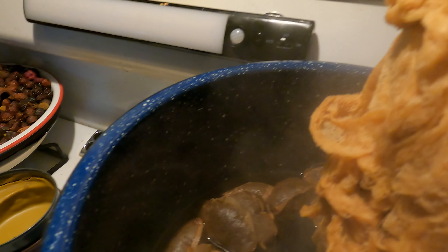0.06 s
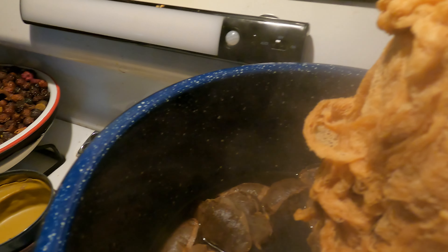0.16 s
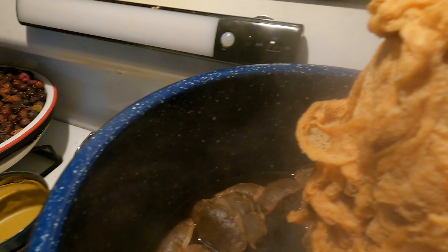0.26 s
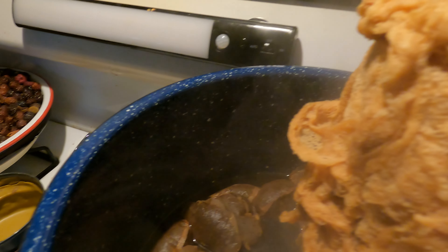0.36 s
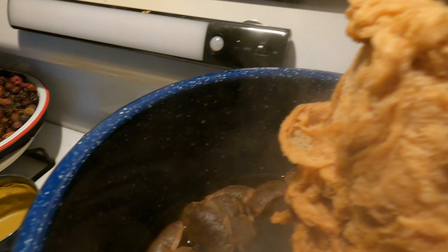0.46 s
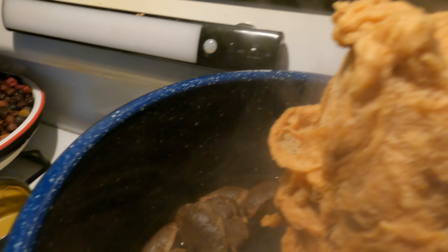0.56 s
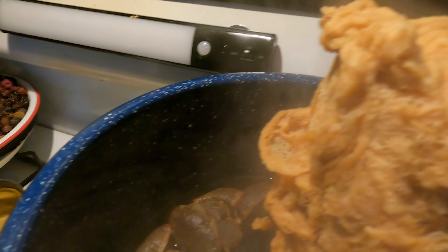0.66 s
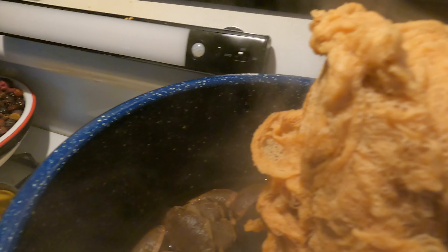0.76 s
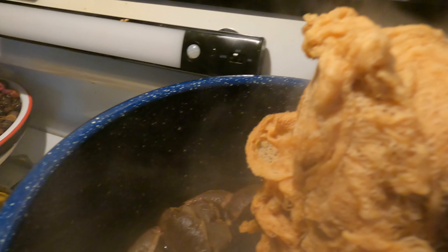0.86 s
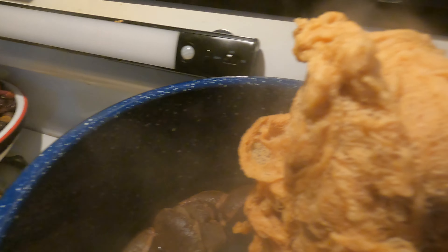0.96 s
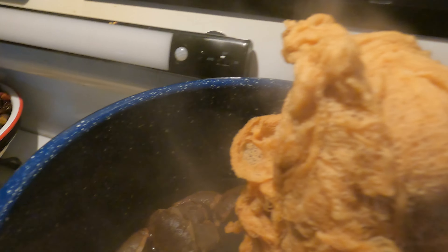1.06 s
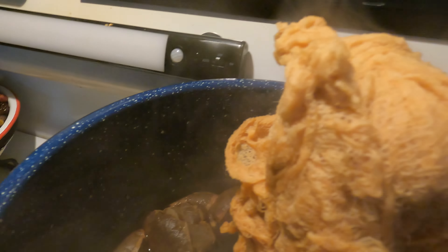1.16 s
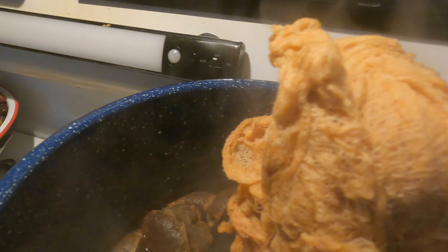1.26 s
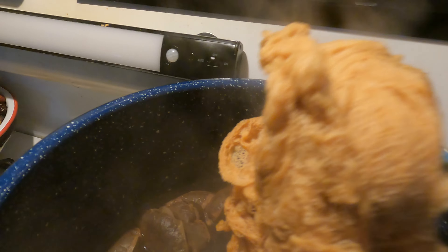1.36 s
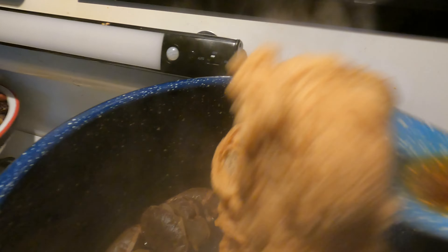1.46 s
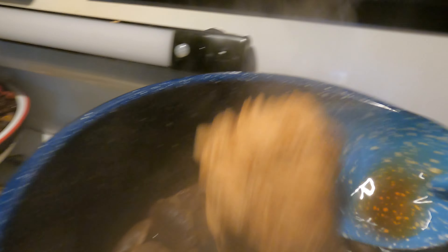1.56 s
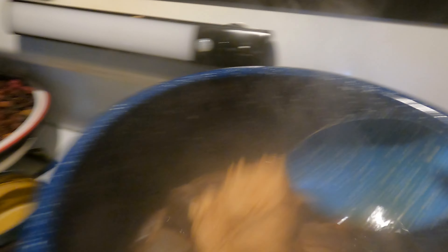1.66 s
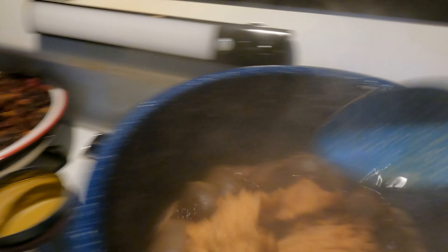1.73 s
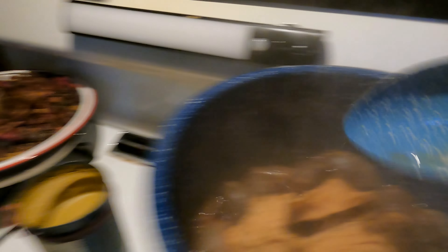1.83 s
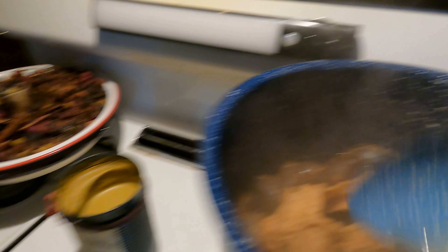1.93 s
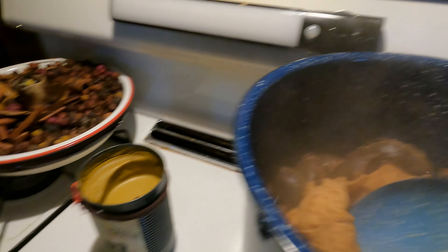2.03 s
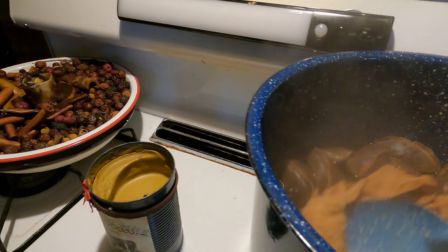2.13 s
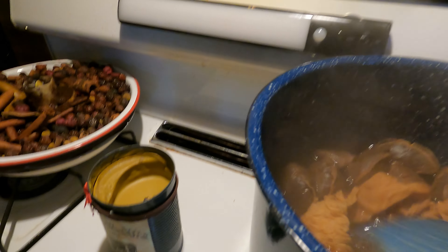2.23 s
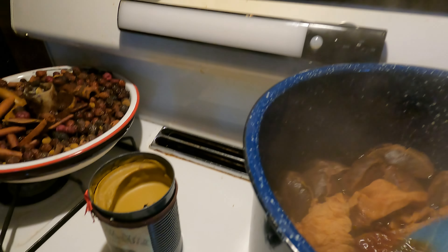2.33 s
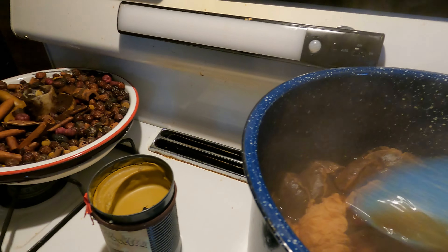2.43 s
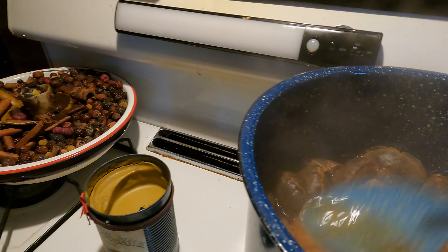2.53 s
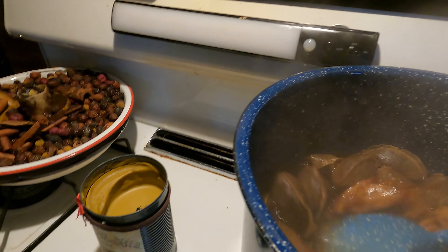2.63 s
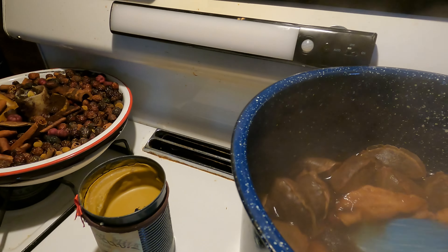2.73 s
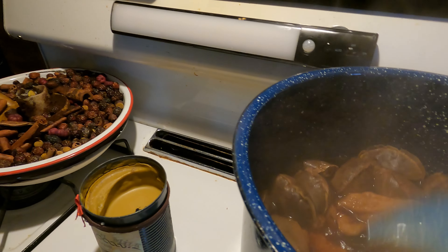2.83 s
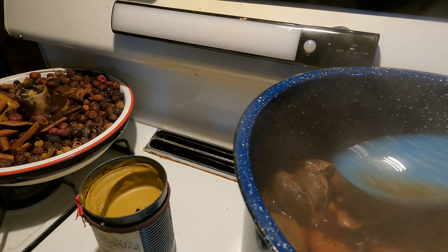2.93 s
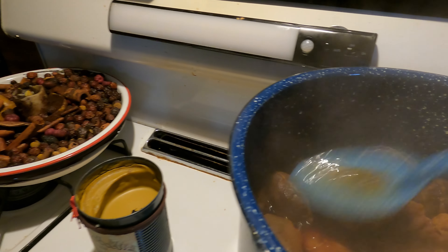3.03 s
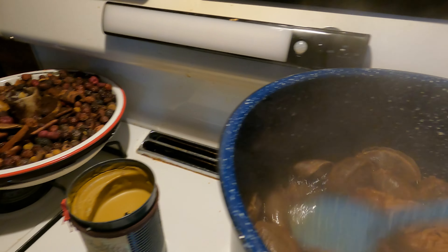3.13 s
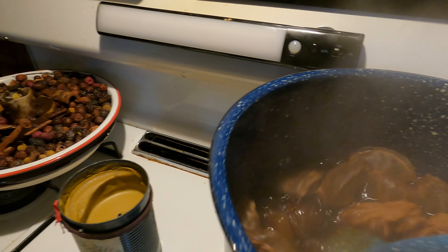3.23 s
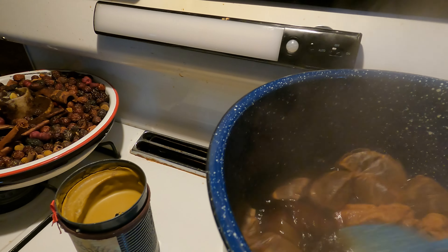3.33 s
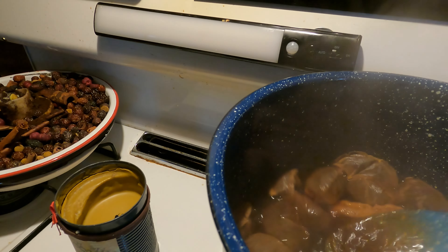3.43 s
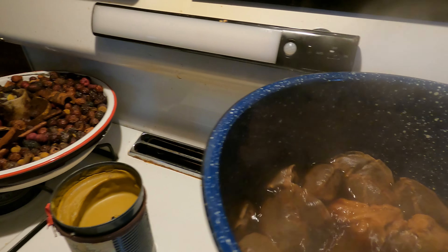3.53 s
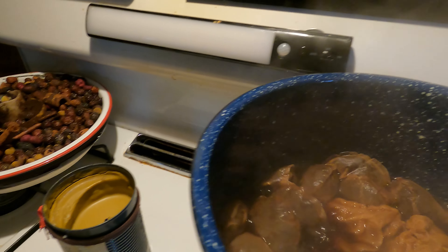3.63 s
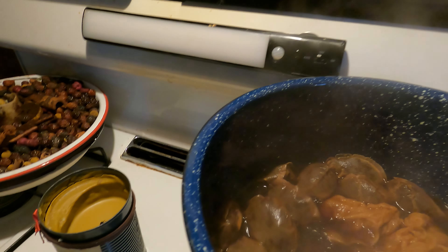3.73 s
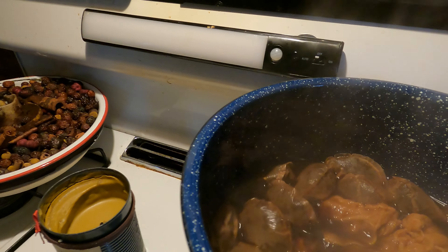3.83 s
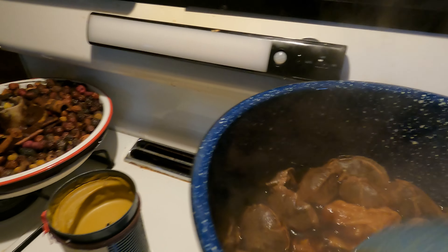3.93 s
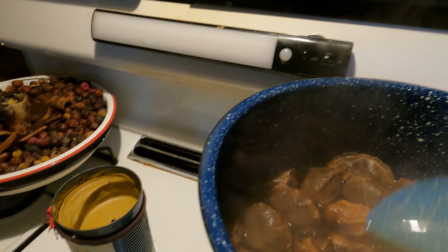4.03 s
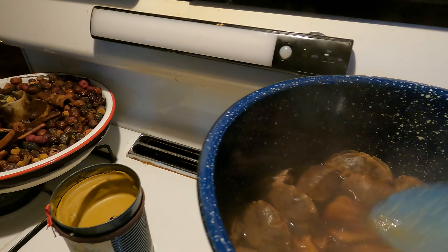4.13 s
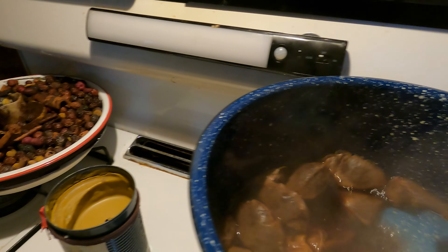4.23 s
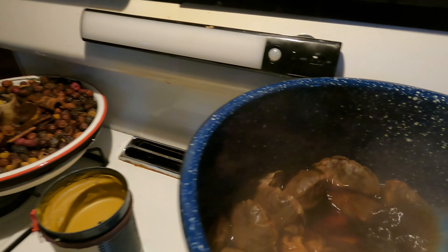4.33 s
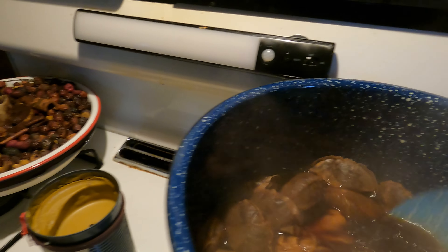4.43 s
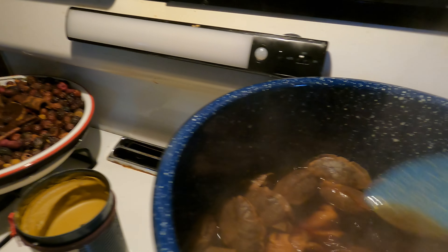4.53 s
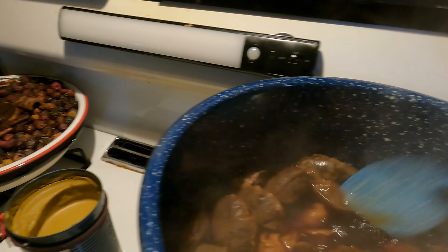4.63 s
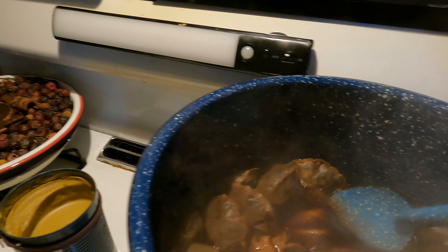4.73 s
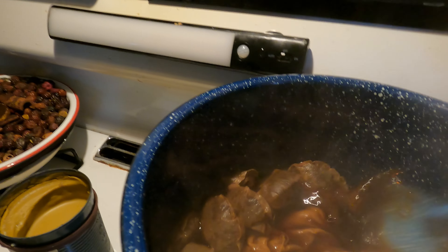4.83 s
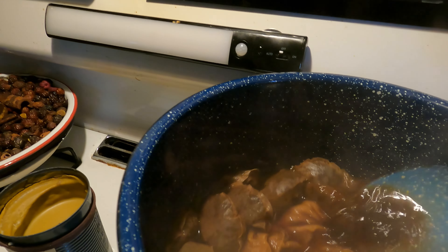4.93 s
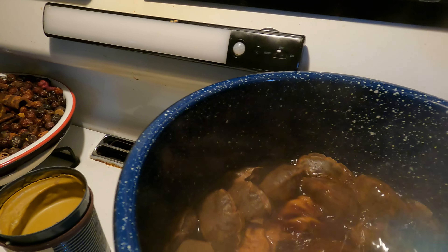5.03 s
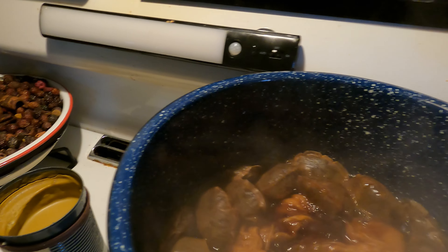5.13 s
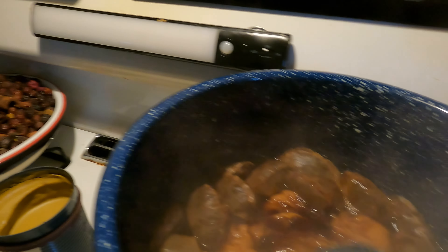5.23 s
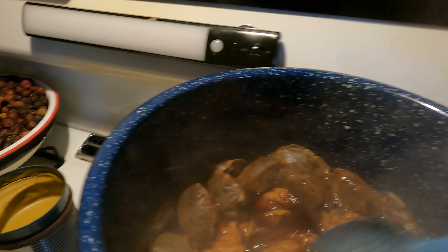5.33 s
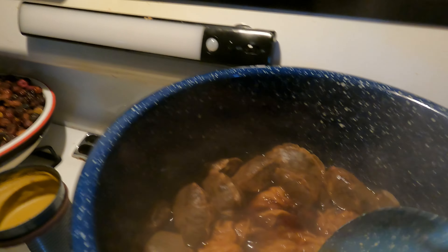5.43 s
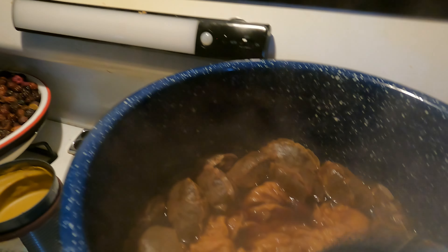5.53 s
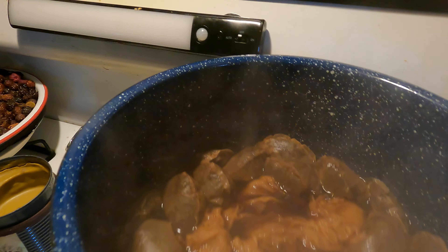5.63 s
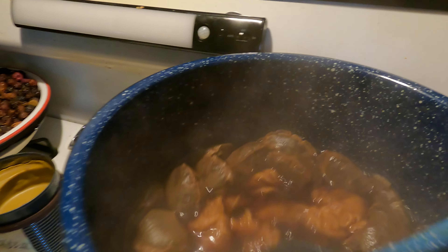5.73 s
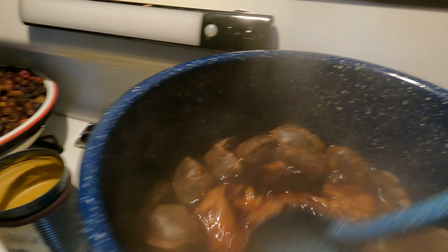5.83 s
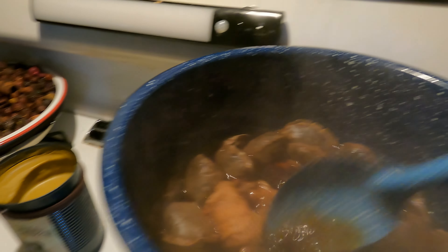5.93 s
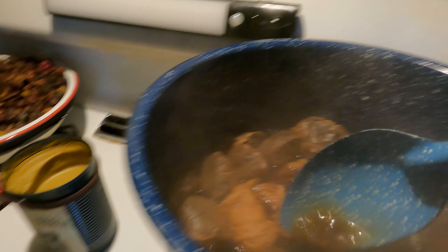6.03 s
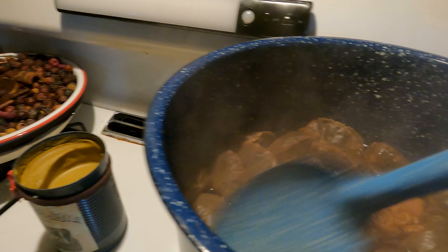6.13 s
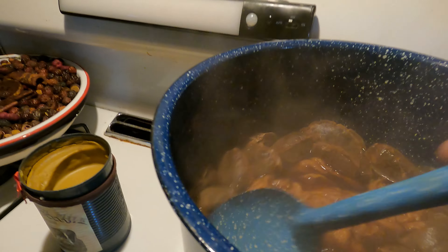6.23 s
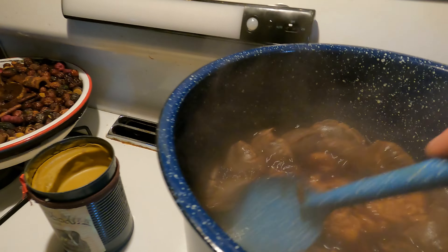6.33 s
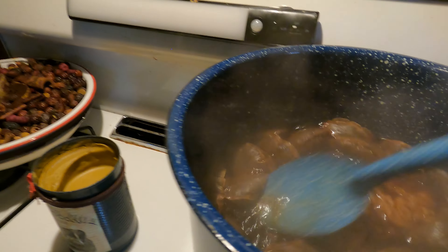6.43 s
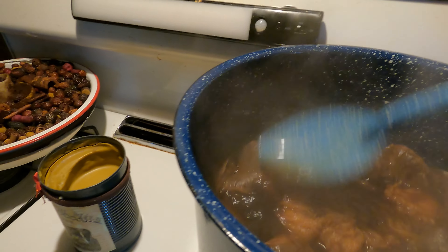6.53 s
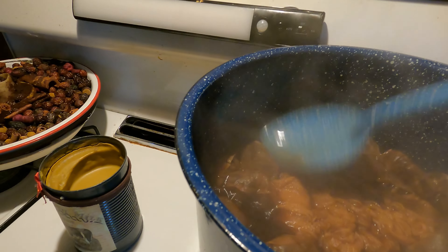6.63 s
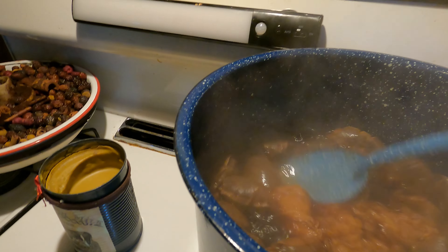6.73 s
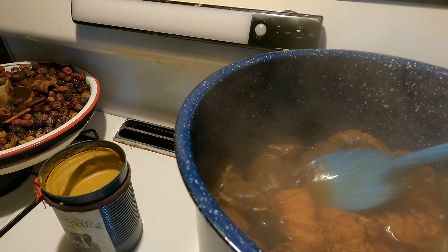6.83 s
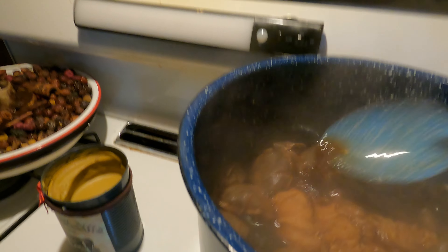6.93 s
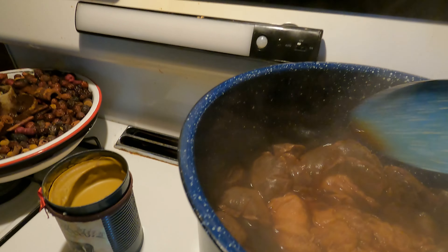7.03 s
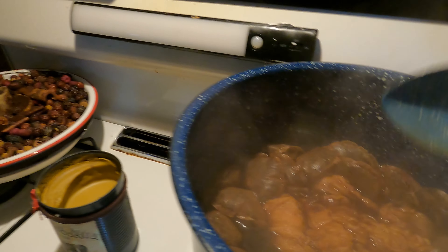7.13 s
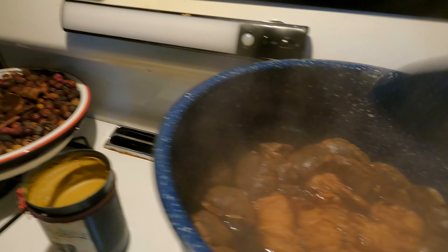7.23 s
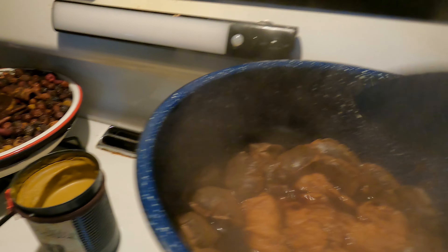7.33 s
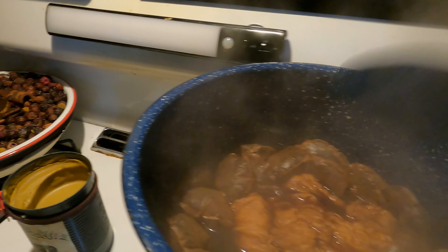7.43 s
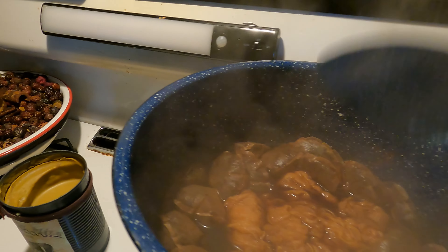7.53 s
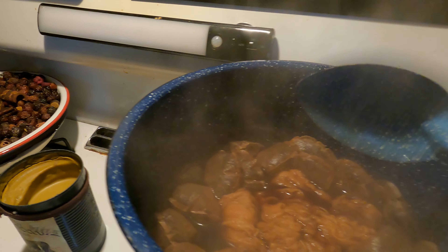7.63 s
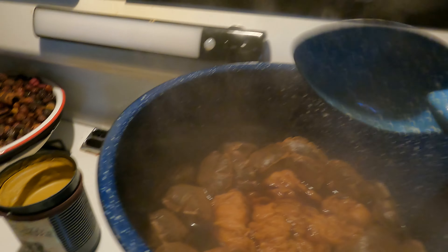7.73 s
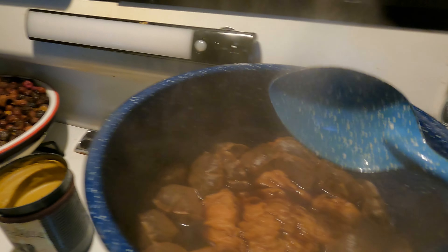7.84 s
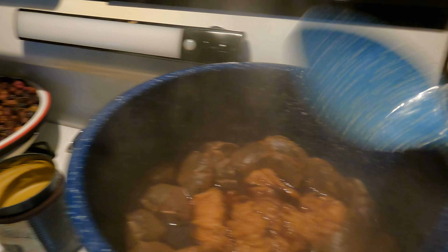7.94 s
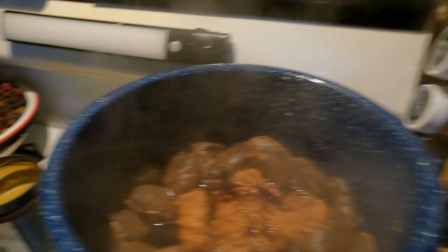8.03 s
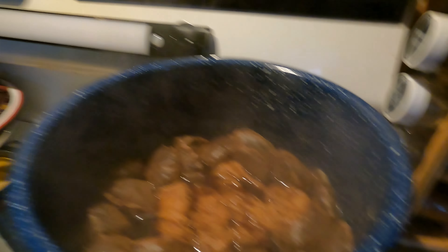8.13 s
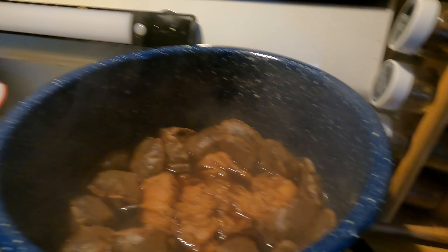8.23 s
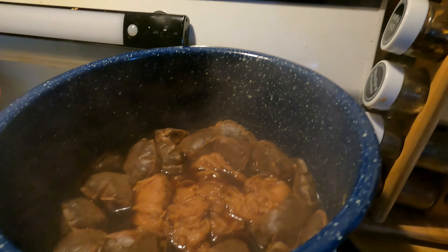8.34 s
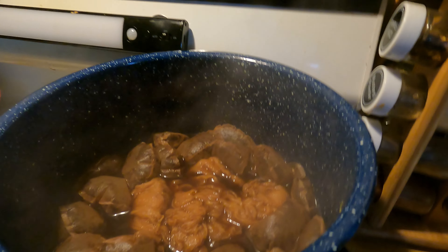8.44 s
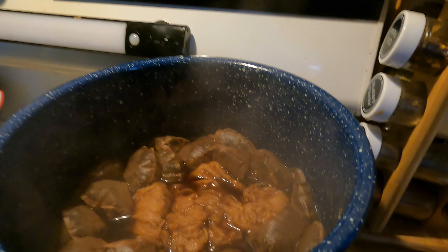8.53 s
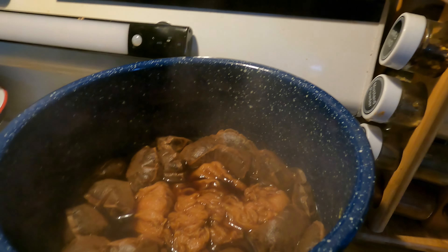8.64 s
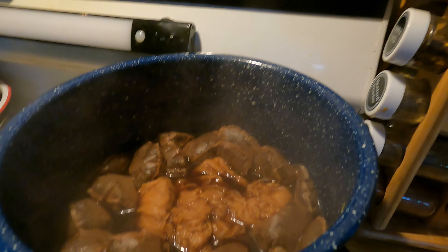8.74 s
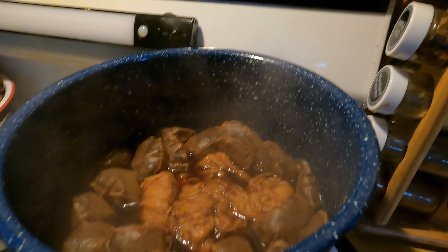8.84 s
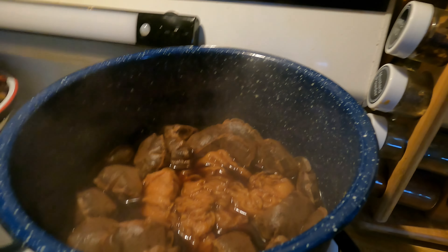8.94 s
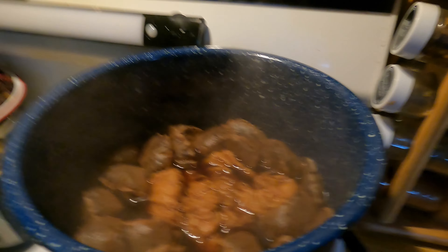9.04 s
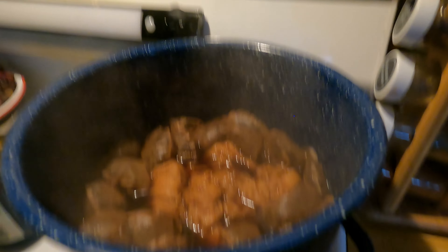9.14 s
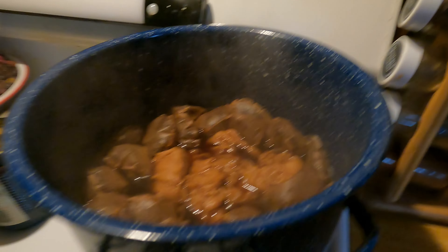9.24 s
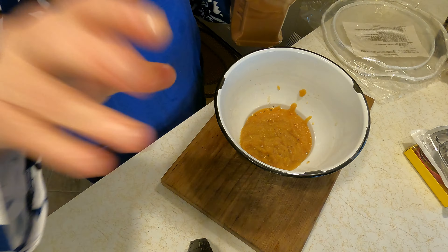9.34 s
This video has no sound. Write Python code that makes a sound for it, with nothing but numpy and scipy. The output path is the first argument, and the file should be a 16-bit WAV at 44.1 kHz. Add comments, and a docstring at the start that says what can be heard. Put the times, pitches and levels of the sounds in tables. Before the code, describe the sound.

Close, hand-held stereo in a small kitchen. Soft handling thuds and button clicks over low rumble and faint hiss, then a sodden lump flops into a pot and a spoon stirs it with squelches, plips and occasional knocks. Four bright rim taps ring out, followed by a heavy handling bump and sharp clicks.

```python
"""Soft thuds and button clicks on a hand-held camera come first, over a low rumble and a pot's faint hiss.
Then a big spoon pushes soggy tea bags and cloth around an enamelled pot: swarms of bubbles squelch,
single bubbles plip as rising tones, wet films snap, and noise bursts and damped sines bump the wall.
Four taps ring the rim. A heavier bump, a faint squeak, a rub of the hand and last clicks follow,
then the sound stops."""
import sys
import numpy as np
from scipy import signal
from scipy.fft import rfft, irfft, next_fast_len
from scipy.io import wavfile

SR = 44100
rng = np.random.default_rng(int(sys.argv[2]) if len(sys.argv) > 2 else 0)


def master(y):
    """Save y as 16-bit WAV."""
    cut = np.clip(np.atleast_2d(y).T, -1, 1)
    pcm = np.round(cut * 32767)  # scale
    wavfile.write(sys.argv[1], SR, pcm.astype(np.int16))


N = 413216
TIME = np.arange(N) / SR
SIDES = np.array([[1], [-1]])  # left, right


def undb(db):
    """Turn decibels into gain."""
    return 10 ** (np.asarray(db) / 20)


def unit(x):
    """Scale to rms 1."""
    return x / np.sqrt(np.mean(x ** 2))


def peak(x):
    """Scale to peak 1."""
    return x / np.abs(x).max()


def at_hz(points, hz):
    """Read (f/Hz, value) points on a log-frequency axis."""
    f, value = np.transpose(points)
    return np.interp(np.log(np.maximum(hz, 1)), np.log(f), value)


def over_time(points):
    """Join (t/s, value) points with straight lines."""
    return np.interp(TIME, *np.transpose(points))


def fade(t, t60):
    """Die away exponentially, by 60 dB in t60 seconds."""
    return np.exp(-np.log(1000) * t / max(t60, 1e-4))


def swell(s, hold_s, rise_db_s, fall_db_s):
    """Gain that rises to 1 at time s, holds, then dies away."""
    before = np.maximum(s - TIME, 0)
    after = np.maximum(TIME - s - hold_s, 0)
    return undb(-abs(rise_db_s) * before - abs(fall_db_s) * after) + 1e-18


def noise(points, size):
    """Noise of rms 1 with a given spectrum: every frequency gets a random phase."""
    fast = next_fast_len(size, real=True)
    hz = np.fft.rfftfreq(fast, 1 / SR)
    phases = np.exp(2j * np.pi * rng.random(len(hz)))
    return unit(irfft(phases * undb(at_hz(points, hz)), fast)[:size])


def whistle(hz, width_hz):
    """A narrow band of noise, rms 1."""
    far = 4 * width_hz
    return noise([(hz - far, -80), (hz - width_hz, -12), (hz, 0), (hz + width_hz, -12), (hz + far, -80)], N)


def modes(table, t, detune=0.0066, onset_s=0.00013):
    """A struck solid rings as damped sines, a little different at each blow."""
    ring = 0
    for hz, db, t60 in table:
        pitch = hz * (1 + detune * rng.standard_normal())
        tone = np.sin(2 * np.pi * pitch * t + 2 * np.pi * rng.random())
        ring = ring + undb(db) * fade(t, t60) * tone
    return ring * (1 - np.exp(-t / onset_s))


def lowpass(x, order, hz):
    """Take away the treble above hz."""
    return signal.sosfilt(signal.butter(order, hz, fs=SR, output="sos"), x)


def smooth(x, seconds):
    """Follow x slowly."""
    k = 1 / (seconds * SR)
    return signal.lfilter([k], [1, k - 1], x)


def add(out, s, x, pan_db=0):
    """Mix a mono or stereo sound into both channels at time s."""
    i = int(s * SR)
    x = x[..., :N - i]
    out[:, i:i + x.shape[-1]] += undb(SIDES * pan_db / 2) * x


def background(rumble_db=-41, hiss_db=-59.5, rumble_side=0.061, hiss_side=0.56, waver_db=2.5, width_hz=20):
    """A low kitchen rumble that wavers, and the thin hiss of the hot pot with its air resonances."""
    # noise colours: f/Hz, relative level/dB
    rumble_color = [(20, -19.5), (32, 2), (52, 6.5), (75, 2), (135, 2.5), (190, -17), (235, -9.5),
                    (290, -25.5), (450, -27), (650, -37), (1200, -104)]
    hiss_color = [(300, 15), (450, 21), (780, 0.5), (1000, 14), (1500, 8), (2200, 4.5), (3000, 4),
                  (4500, 9), (7800, 4), (8200, -5), (12000, -10.5), (15000, -23)]
    # slow change of the rumble: t/s, level/dB
    sway = [(0, 0.5), (1.6, -1), (2.2, -1.5), (4.2, -1), (6.3, 1), (6.8, -3), (7.6, 3), (9.3, 2.5)]
    # where the camera is held: t/s, place (0 above the pot to 1 beside it)
    place = [(0, 0), (1.55, 0), (2.0, 0.67), (4.6, 0.8), (5.5, 0.67), (6.3, 0.14), (7.1, 0.83), (8.2, 0.33)]
    # air resonances inside the pot: f/Hz, level above the pot/dB, level beside it/dB
    air_modes = [(951, -76, -68.5), (4280, -73, -78), (4720, -75.5, -88), (4880, -76, -88),
                 (5200, -98, -64), (5620, -79.5, -72.5), (6350, -83, -75), (6850, -83, -88)]
    waver = undb(waver_db * noise([(1, -9.0), (8, 14), (25, -9.0), (100, -120)], N))
    rumble = noise(rumble_color, N) + rumble_side * SIDES * noise(rumble_color, N)
    rumble = undb(rumble_db + over_time(sway)) * waver * rumble
    hiss = undb(hiss_db) * (noise(hiss_color, N) + hiss_side * SIDES * noise(hiss_color, N))
    aside = np.clip(over_time(place), 0, 1)
    air = 0
    for hz, above_db, beside_db in air_modes:
        air = air + undb(above_db + aside * (beside_db - above_db)) * whistle(hz, width_hz)
    return rumble + hiss + air


def sizzle(ticks_per_s=45, spread_db=4.5, level_db=-78, t60=0.004):
    """Tiny bubbles burst on the hot wall with very short, high ticks."""
    t = TIME[:256]
    sizes_db = spread_db * np.minimum(rng.exponential(size=(2, N)), 3.5)
    bursts = (rng.random((2, N)) < ticks_per_s / SR) * undb(sizes_db)
    tick = noise([(3000, -9), (7000, 1.5), (10500, -3), (13000, -7), (15500, -30)], len(t)) * fade(t, t60)
    both_sides = bursts + 0.6 * bursts[::-1]  # each side also hears the other
    return undb(level_db) * unit(signal.oaconvolve(both_sides, tick[None], axes=1)[:, :N])


def thud(hz, t60, sharp, rattle_db=-13.0, rattle_t60=0.1):
    """A soft blow starts higher and sinks as the contact spreads; the case rattles with it."""
    sink_s = 0.0013
    t = TIME[:SR // 3]
    # the pitch starts at (1 + sharp) times hz
    cycles = hz * (t + sharp * sink_s * (1 - np.exp(-t / sink_s)))
    tone = peak(np.sin(2 * np.pi * cycles) * fade(t, t60) * (1 - np.exp(-t / 0.0023)))
    case = noise([(100, -36.5), (230, 12.0), (450, 12.5), (760, -15.0), (1050, -2), (1600, -14.5),
                  (2500, -25.5), (9000, -43)], len(t))
    # a longer thud also rattles longer
    case = case * fade(t, rattle_t60 * t60 / 0.067) * (1 - np.exp(-t / 0.00042))
    return tone + undb(rattle_db) * case


def handling(click_rise_s=0.00026, squeak_width_hz=60):
    """Soft thuds and one heavier bump; the button clicks and thumps, the hand rubs, something squeaks."""
    # soft thuds on the camera and the stove: t/s, f/Hz, tone peak level/dB
    soft_thuds = [(0.026, 172, -32), (0.162, 215, -41), (0.24, 266, -36.5), (0.414, 138, -31),
                  (.596, 135, -30.5), (0.778, 134, -26.5), (0.931, 174, -34.5), (0.975, 112, -30.5),
                  (2.6, 170, -32), (2.758, 208, -34.5), (2.907, 256, -35), (3.075, 183, -36),
                  (4.501, 132, -28), (4.99, 200, -37.5), (5.196, 206, -34.5), (5.476, 176, -32.5),
                  (5.682, 173, -31), (8.511, 236, -29), (8.53, 330, -39), (8.544, 140, -21),
                  (8.559, 160, -24.5), (8.994, 136.6, -25), (9.151, 216, -33.5)]
    # what the heavier bump rings: f/Hz, tone peak level/dB, t60/s
    bump_modes = [(236.5, -15, 0.07), (230, -31.5, 0.74), (312, -30.5, 0.22), (93, -25.5, 0.099),
                  (548, -33, 0.033)]
    # finger on the case and button: t/s, click peak level/dB, click f/Hz, click t60/s,
    # thump level/dB, left minus right level/dB
    button_clicks = [(0.7783, -33.5, 820, 0.0076, -56, -12), (0.932, -43, 855, 0.0091, -31, -13.5),
                     (1.122, -29, 3400, 0.0027, -50, -2), (1.1223, -30.5, 830, 0.0087, -18.5, -11),
                     (1.2323, -35, 885, 0.0049, -25.5, -9), (9.225, -25, 4900, 0.0054, -48, 0.5),
                     (9.2345, -22, 4500, 0.0045, -35, 12), (9.2554, -11, 1670, 0.019, -21.5, -4)]
    thud_cycles, thud_sharp = 9.2, 1.44  # cycles until 60 dB down; extra pitch at the start
    thump_hz, thump_t60, thump_sharp = 69.7, 0.031, 6.1
    bump_s, edge_db_s = 8.480, 599
    out, t = np.zeros((2, N)), TIME[:SR // 3]
    for s, hz, db in soft_thuds:
        add(out, s, undb(db) * thud(hz, thud_cycles / hz, thud_sharp))
    add(out, bump_s, sum(undb(db) * thud(hz, t60, 0) for hz, db, t60 in bump_modes))
    for s, db, hz, t60, thump_db, pan_db in button_clicks:
        click = noise([(hz / 10, -14), (hz / 3, -9), (hz * 0.35, -1), (hz * 1.44, 0), (hz * 3, -22),
                       (hz * 10, -36)], len(t))
        click = peak(click * fade(t, t60) * np.minimum(t / click_rise_s, 1))
        thump = thud(thump_hz, thump_t60, thump_sharp)
        add(out, s, undb(db) * click + undb(thump_db) * thump, pan_db)
    # the grip rustles while the bump settles
    settle = undb(-27.5) * swell(bump_s + 0.0051, 0.038, edge_db_s, 265)
    settle = settle * noise([(40, 8), (100, 11), (350, 1.0), (500, -23.5), (1000, -32), (3000, -45),
                             (8000, -41), (15000, -73)], N)
    squeak = undb(-64) * swell(8.625, 0.033, edge_db_s, edge_db_s) * whistle(2500, squeak_width_hz)
    rub = undb(-51) * swell(8.95, 0.056, edge_db_s, edge_db_s)
    rub = rub * noise([(100, -10), (400, -3.5), (1400, -3.5), (3000, -11.5), (8000, -9), (15000, -55)], N)
    return out + settle + squeak + rub


def bubble(hz, cycles, rise=0.1):
    """An air pocket rings and rises in pitch as it surfaces."""
    age = TIME[:int(cycles / hz * SR) + 8] * hz / cycles  # 1 when 60 dB down
    return np.sin(2 * np.pi * cycles * (age + rise * age ** 2 / 2)) * fade(age, 1)


def flops(cycles=9, splat_db=-9, splat_t60=0.04):
    """A lump of cloth or bags closes a pocket of air: a low gulp with a short, wet splat."""
    # sodden lumps fall into the liquid: t/s, f/Hz, gulp level/dB
    lumps = [(1.769, 320, -34.5), (1.785, 170, -29.5), (1.846, 215, -30), (3.453, 230, -31.5),
             (4.316, 330, -29), (4.362, 340, -32), (4.425, 400, -37)]
    out, t = np.zeros((2, N)), TIME[:SR // 8]
    for s, hz, db in lumps:
        splat = noise([(200, -7), (450, 3), (1100, -0.5), (2000, -7), (4000, -13.5), (9000, -36)], len(t))
        splat = splat * fade(t, splat_t60) * np.minimum(t / 0.002, 1)
        add(out, s, undb(db) * bubble(hz, cycles))
        add(out, s, undb(db + splat_db) * splat)
    return out


def snaps(t60=0.0086, rise_s=0.00021):
    """A film of liquid tears with a short, unpitched click."""
    # wet films between spoon, cloth and bags: t/s, peak level/dB, centre f/Hz, left minus right level/dB
    films = [(1.6855, -29.5, 6300, -2), (1.7404, -33.5, 3150, -1), (1.77, -32.5, 1410, 0),
             (1.7865, -33, 6300, -2), (2.6299, -34, 8000, -2), (2.6575, -24, 4700, -4),
             (3.1438, -28, 4570, -1), (3.4605, -43, 9500, 0), (3.9049, -22.5, 2200, -1),
             (5.0933, -30.5, 3060, 0), (5.112, -36.5, 8050, 0), (5.2325, -18.5, 3220, -2),
             (5.2378, -21.5, 4280, -2), (6.3755, -34, 9000, -1), (7.216, -42.5, 11600, 0)]
    out, t = np.zeros((2, N)), TIME[:1024]
    for s, db, hz, pan_db in films:
        click = noise([(hz / 5, -30), (hz * 0.9, -2), (hz, 0), (hz * 0.97, -3), (hz * 3, -32)], len(t))
        add(out, s, undb(db) * peak(click * fade(t, t60) * np.minimum(t / rise_s, 1)), pan_db)
    return out


def plips(snap_db=-12, snap_t60=0.015, level_db=3, open_cycles=0.22):
    """Single bubbles swell within a cycle and open with a tiny wet snap near their own pitch."""
    # clearest bubbles and drops: t/s, f/Hz, level before level_db/dB, cycles until 60 dB down,
    # left minus right level/dB
    clear_bubbles = [(1.568, 2560, -33, 19, 0), (1.612, 1150, -40.5, 8, 0), (1.641, 2600, -28.5, 7.4, 2),
                     (1.667, 2910, -34, 10, 2), (1.961, 7800, -37.5, 33, -2), (2.080, 4200, -31, 7.2, -3),
                     (2.159, 2140, -35, 8.8, -3), (2.392, 1840, -38, 7.1, -3), (2.223, 3670, -34.5, 28, 0),
                     (2.609, 2640, -29.5, 4.4, -2), (2.79, 3270, -39.5, 17, -4), (3.436, 1850, -39, 22, -1),
                     (3.641, 3660, -34.5, 24, -4), (2.631, 1940, -34, 34, -1), (2.6595, 5030, -26, 56, -3),
                     (2.692, 3560, -23.5, 29, -2), (2.765, 3680, -39.5, 32, -7), (2.953, 6100, -39, 24, -2),
                     (3.591, 3120, -34, 24, -2), (3.6518, 4470, -17, 8.3, -18), (3.8106, 1940, -33, 36, -1),
                     (4.143, 3060, -27.5, 4.3, -3), (4.176, 4200, -17, 5, -2),
                     (4.3953, 3230, -31, 19, -0.5), (4.689, 4600, -8, 3, -2), (4.802, 4380, -26, 56, -2),
                     (5.008, 1040, -29, 6.1, -1), (5.034, 1580, -29, 8.5, -1), (5.1212, 2800, -21.5, 28, 0),
                     (5.128, 5350, -23.5, 11, -2), (5.2361, 2360, -20, 56, 1), (5.3167, 4900, -35, 14, 2),
                     (5.3457, 4180, -37.5, 17, 2), (5.382, 4120, -40.5, 20, 1),
                     (5.4513, 4160, -37.5, 30, 0), (5.5105, 4050, -34.5, 15, 0),
                     (5.6296, 1610, -43.5, 7, -1), (5.661, 6100, -35, 27, -2), (5.8155, 2220, -33, 8, 1),
                     (5.830, 4020, -25, 14, 0.5), (5.935, 2460, -33.5, 20, 0),
                     (6.233, 2600, -24.5, 54, -0.5), (6.341, 1500, -41.5, 29, -0.5),
                     (6.422, 2800, -43, 20, -1), (6.805, 4220, -31, 33, 2), (6.8187, 6820, -30, 170, -0.5),
                     (6.956, 3240, -35.5, 14, 0), (7.049, 2620, -39.5, 91, -1),
                     (7.142, 2710, -34, 30, -1.5)]
    out, t = np.zeros((2, N)), TIME[:1024]
    for s, hz, db, cycles, pan_db in clear_bubbles:
        ring = bubble(hz, cycles)
        opening = 1 - np.exp(-TIME[:len(ring)] * hz / open_cycles)
        add(out, s, undb(db + level_db) * ring * opening, pan_db)
        snap = noise([(hz / 3, -24), (hz * 0.67, 0), (hz * 1.8, -2), (hz * 2, -11), (hz * 4, -36)], len(t))
        snap = snap * fade(t, snap_t60) * np.minimum(t * hz / open_cycles, 1)
        add(out, s, undb(db + snap_db) * snap, pan_db)
    return out


def froth(points, per_s, cycles, spread_db, count=22):
    """A swarm of small bubbles of all sizes, most of them weak, spread left and right; rms 1."""
    out = np.zeros((2, N))
    for hz in np.geomspace(points[0][0], min(points[-1][0], 10500), count):
        ring = bubble(hz, cycles)
        ring = ring * undb(at_hz(points, hz)) / np.linalg.norm(ring)
        when, size, side = rng.random((int(per_s * N / SR / count), 3)).T
        size = undb(-spread_db * np.log(np.maximum(size, .02))) * np.sign(side - .5)
        lean = 0.14 * (np.abs(2 * side - 1) - .5)
        starts = (when * (N - len(ring))).astype(int)
        places = starts[:, None] + np.arange(len(ring))
        for channel, gain in enumerate((1 + lean, 1 - lean)):
            out[channel] += np.bincount(places.ravel(), np.outer(size * gain, ring).ravel(), N)
    return unit(out)


def clumps(depth_db):
    """Wet bags give way in quick, uneven spurts."""
    return unit(undb(depth_db * noise([(5, -28.5), (15, 9.5), (60, 8.5), (150, -33.5), (500, -120)], N)))


def drag(slips_per_s=2600):
    """The spoon sticks and slips over the bottom: it judders at its own pitch and grinds."""
    # strokes over the bottom: t/s, held for/s, judder level/dB, judder f/Hz, grit level/dB
    strokes = [(3.284, 0.1, -33, 1224, -57.5), (3.305, 0.054, -45.5, 1290, -37.5),
               (4.225, 0.055, -42.5, 942, -54), (4.235, 0.049, -46, 1527, -54),
               (4.71, 0.077, -44.5, 959, -52), (5.71, 0.033, -44.5, 1130, -56.5),
               (6.28, 0.056, -47, 982, -56)]
    # the juddering spoon: multiple of the judder pitch, level/dB, t60/s
    spoon_modes = [(.483, -14.5, 0.12), (.8, -1, 0.025), (0.999, 0, 0.074), (1.1, -2.5, 0.053),
                   (1.183, -7, 0.1), (1.58, -9.5, .025), (2.178, -10, .025)]
    # colour of the grinding: f/Hz, relative level/dB
    grit_color = [(500, -10), (1200, -0.5), (2600, 5), (3900, 3), (5200, -6.5), (7400, -13), (8500, -24),
                  (15000, -47.5)]
    rise_db_s, fall_db_s = 650.5, 302
    out, t = 0, TIME[:SR // 20]
    for s, hold, db, hz, grit_db in strokes:
        slips = (rng.random(N) < slips_per_s / SR) * rng.standard_normal(N)
        spoon = modes([(hz * k, mode_db, t60) for k, mode_db, t60 in spoon_modes], TIME[:SR // 8])
        judder = unit(signal.oaconvolve(slips, spoon)[:N])
        grit = unit(signal.oaconvolve(slips, noise(grit_color, len(t)) * fade(t, 0.034))[:N])
        stroke = undb(db) * judder + undb(grit_db) * grit
        out = out + stroke * swell(s, hold, rise_db_s, fall_db_s)
    return out * clumps(depth_db=2.5)


def slosh(gurgle_db=-1, idle_db=-76, after_db=-17, settle_s=0.2, soften_hz=11000):
    """Pressed bags gurgle and spit, trapped air surfaces for a while after; the spoon judders."""
    # the spoon presses the bags: t/s, held for/s, gurgle level before gurgle_db/dB, spray level/dB
    presses = [(1.60, 0.082, -51.5, -52), (1.675, 0.054, -52.5, -48), (1.78, 0.034, -48, -46.5),
               (1.865, 0.0051, -51.5, -58.5), (2.11, 0.14, -58, -56.5), (2.621, 0.01, -55.5, -47),
               (2.768, 0.034, -57.5, -52.5), (3.139, 0.0027, -45.5, -49.5), (3.181, 0.13, -54.5, -55),
               (3.294, 0.11, -37.5, -53.5), (3.65, 0.1, -51.5, -54.5), (4.171, 0.0026, -45.5, -42.5),
               (4.21, 0.23, -52, -63), (4.695, 0.038, -43, -52.5), (4.782, 0.0088, -37.5, -40),
               (4.98, 0.22, -55, -55), (5.32, 0.21, -75, -62.5), (5.63, 0.0039, -45, -53),
               (5.731, 0.031, -49.5, -59.5), (5.82, 0.064, -54, -64.5), (6.228, 0.097, -47.5, -56),
               (6.355, 0.012, -61.5, -55), (6.43, 0.0079, -51.5, -59), (6.701, 0.0037, -40.5, -42),
               (6.84, 0.12, -59, -79)]
    # bubble colours: f/Hz, relative level/dB
    gurgle_color = [(250, 0), (500, 7.5), (750, -2), (1250, 9.5), (1900, 4), (3000, -0.5)]
    spray_color = [(2000, 2.5), (3800, 12.5), (6500, 12), (8500, 3.5), (12000, 7.5), (15000, -22)]
    # every push wells up quickly; the spray stops sooner than the gurgle
    rise_db_s, gurgle_fall_db_s, spray_fall_db_s = 443, 196.5, 280
    flow = sum(undb(db) * swell(s, hold, rise_db_s, gurgle_fall_db_s) for s, hold, db, _ in presses)
    squirt = sum(undb(db) * swell(s, hold, rise_db_s, spray_fall_db_s) for s, hold, _, db in presses)
    gurgle = froth(gurgle_color, per_s=5000, cycles=14, spread_db=3) * flow
    gurgle = gurgle * undb(gurgle_db) * clumps(depth_db=2.5)
    spray = froth(spray_color, per_s=7000, cycles=14.0, spread_db=4.5) * squirt * clumps(depth_db=4.0)
    after = froth([(1700, -2), (3500, 0), (6500, -4), (10000, -10)], per_s=60, cycles=30, spread_db=3)
    after = after * smooth(flow, settle_s) * undb(after_db)
    # a faint fizz never stops
    idle = froth([(5000, -7.0), (8000, 3.0), (11000, -12.0)], per_s=25, cycles=48, spread_db=3.5, count=12)
    # the bubbling's very top is softened
    return lowpass(gurgle + spray + after + drag(), 2, soften_hz) + undb(idle_db) * idle


def in_pot(x):
    """Sounds at the liquid's surface bounce between the walls."""
    # echoes across the pot: t/s, gain
    echoes = [(.0012, 0.051), (.0023, -0.082), (.0047, .2), (.0066, 0.092)]
    return x + sum(gain * np.roll(x, int(s * SR), axis=1) for s, gain in echoes)


def dense_ring(t, rim, dull_db=14):
    """Crowded modes each fade at a rate set by their pitch; below the rim the liquid dulls the treble."""
    # dense ring of the pot and the kitchen: f/Hz, relative level/dB
    ring_color = [(35, 12), (90, 15), (180, 11), (320, 8), (450, -0.5), (620, 0.5), (950, -3), (1500, -5.5),
                  (2800, -9.5), (4000, -7), (6800, -6.5), (8300, -14.5), (12000, -17), (15000, -40)]
    # how long it lasts: f/Hz, t60/s
    ring_t60 = [(100, 0.57), (260, 0.72), (700, 0.51), (1840, 0.41), (4850, 0.22), (12000, 0.072)]
    hz = np.fft.rfftfreq(len(t), 1 / SR)
    dulling = undb(-dull_db * (1.0 - rim) * np.clip(hz / 4000, 0, 1))
    spectrum = rfft(noise(ring_color, len(t))) * dulling
    out = 0
    for centre in np.geomspace(31.25, 16000, 10):  # overlapping octave bands
        share = np.clip(1 - np.abs(np.log2((hz + 1) / centre)), 0, 1)
        out = out + irfft(spectrum * share, len(t)) * fade(t, at_hz(ring_t60, centre))
    return out


def rattle(t, count=7):
    """The pot makes a few uneven, weakening bounces on the grate."""
    # the bouncing pot: f/Hz, level/dB, t60/s
    bounce_modes = [(1116, -5.5, .03), (1338, 1, 0.033), (2670, 0, 0.011), (4100, -3, 0.014),
                    (4680, -10, 0.03), (6210, -6, 0.014)]
    first_s, gap_s, loss_db = 0.03, .0085, 2.2  # loss per bounce
    out = np.zeros(len(t))
    jitter, sizes = rng.random((count, 2)).T
    for k, s in enumerate(first_s + gap_s * (np.arange(count) + jitter - .5)):
        i = max(int(s * SR), 0)
        bounce = modes(bounce_modes, TIME[:SR // 20])
        out[i:i + len(bounce)] += undb(-loss_db * k) * (.5 + sizes[k]) * bounce
    return out


def bloom(t, detune=0.0093):
    """The pot's lowest bell mode draws its energy from the wall: it swells, then dies."""
    age = t / 0.045  # 1 at its peak
    hz = 225.1 * (1 + detune * rng.standard_normal())
    return (age * np.exp(1 - age)) ** 2 * np.sin(2 * np.pi * (hz * t + rng.random()))


def knocks(contact_s=0.0029, crack_t60=0.019, crack_db=-2.0, hardness=1.02, rim_db=-2, ring_db=1.5,
           ring_side=0.45, boom_db=4.0, swell_s=0.00096, local_t60=0.067, local_width=0.1,
           wall_modes_db=-6, rattle_db=-6):
    """The spoon chatters, the struck spot knocks, the wall rings, the pot rattles, the stove top booms."""
    # the spoon meets the pot: t/s, crack level/dB, wall ring level/dB, rim contact (0 to 1),
    # left minus right level/dB, local knock f/Hz, local knock level/dB, crack pitch ratio;
    # levels stand before the settings above
    blows = [(3.6560, -12.5, -54, 0.96, 1, 4140, -25, 0.96), (3.9043, -27, -49.5, 0, -0.5, 912, -26, 0.7),
             (4.2892, -8, -30.5, 0.6, 2.5, 591, -14, 0.74), (4.678, -13.5, -33.5, 0.3, 1.5, 970, -22, 0.9),
             (6.2312, -12.5, -27, 0.1, 1, 895, -11.5, 0.96), (6.2342, -29, -35, 0, 4, 470, -13, 0.7),
             (6.469, -55, -51.5, 0, 0.5, 986, -32, 1.0), (7.3069, -6.5, -19.5, 1, 2, 4100, -13.5, 1.0),
             (7.5042, -6, -20.5, 0.9, 2.5, 930, -13, 1.0), (7.685, -4, -20.5, 0.8, 2.5, 650, -16.5, 1.0),
             (7.851, -2, -19, 1, 2.5, 630, -10.5, 1.0)]
    # first contact: f/Hz before the pitch ratio, relative level/dB
    crack_color = [(150, 10.5), (400, -5.5), (900, 2.5), (1500, 1), (2100, -2), (3100, -6.5), (3950, 8.5),
                   (4530, -1.5), (5200, 2.5), (7100, 1.5), (8200, -5), (10300, -11.5), (12300, -28),
                   (15000, -46.5)]
    # bright, short modes of the enamelled rim: f/Hz, relative level/dB, t60/s
    rim_modes = [(2900, 5, 0.0049), (3840, 2.5, 0.031), (4480, -11, 0.01), (4710, 5.5, 0.011),
                 (5170, -8.5, 0.02), (5630, 3.5, 0.0078), (6120, -18.5, 0.023), (7120, 1.5, 0.0066),
                 (7360, -2.5, 0.029), (11900, -15, 0.024)]
    # pot wall and stove top: f/Hz, relative level/dB, t60/s
    pot_modes = [(98.9, -1, 0.32), (153.6, 1.5, 1.0), (171.6, -1, 0.93), (237.6, -4.5, 0.93),
                 (273.4, 0.5, 0.26), (368.6, 0, 0.32), (512, -7.5, 0.28), (550, -9.5, 0.53),
                 (562, 6.5, 0.084), (704, -6, 0.24), (790, -19.5, 0.3), (944, -8, 0.61),
                 (1174, -24.5, 0.23)]
    # thin, higher modes of the pot wall: f/Hz, relative level/dB, t60/s
    wall_modes = [(341, -3.5, 0.38), (457, -8.5, 0.6), (605, -8, 0.28), (988, -8, 0.44),
                  (1027, -10.5, 0.47), (1236, -11, .23), (1396, -16, 0.18), (1630, -19.5, .2),
                  (1875, -13, 0.31), (2400, -17.5, 0.16), (3120, -11, 0.2), (3860, -10.5, 0.18),
                  (4320, -15.5, 0.14), (4900, -7, 0.13), (6350, -18, 0.17), (6900, -13.5, .13)]
    boom_growth = 1.21  # dB of boom per dB of wall ring: hard blows boom more
    bloom_db, crack_top_hz = -3, 12300  # little of the crack's treble lies above this
    out, t = np.zeros((2, N)), TIME[:SR]
    highpass = signal.butter(2, 1000, "high", fs=SR, output="sos")
    for s, hit_db, wall_db, rim, pan_db, hz, local_db, pitch in blows:
        chatter = noise([(f * pitch, db) for f, db in crack_color], SR)
        chatter = chatter * np.minimum(t / 0.0002, 1) * fade(np.maximum(t - contact_s, 0), crack_t60)
        chatter = np.tanh(hardness * peak(chatter)) / np.tanh(hardness)
        chatter = lowpass(chatter, 4, crack_top_hz)
        rim_ring = rim * peak(modes(rim_modes, t, detune=0.0017))
        crack = undb(crack_db) * chatter + undb(rim_db) * rim_ring
        local = modes([(hz, 0, local_t60), (hz * (1 + local_width), -4, local_t60 / 2),
                       (hz * (1 - local_width), -4, local_t60 / 2)], t) / 2
        # the wall radiates from all round, so its short waves differ between the two sides
        spread = signal.sosfilt(highpass, dense_ring(t, rim))
        ring = dense_ring(t, rim) + ring_side * SIDES * spread
        boom = undb(boom_growth * wall_db + boom_db) * modes(pot_modes, t) / 2
        wall = undb(wall_modes_db) * modes(wall_modes, t, detune=0.0043)
        wall = wall + undb(rattle_db) * rim * rattle(t) + undb(bloom_db) * bloom(t)
        body = undb(wall_db + ring_db) * ring + boom + undb(wall_db) * wall
        body = body * (1 - np.exp(-t / swell_s))
        add(out, s, undb(hit_db) * crack + undb(local_db) * local + body, pan_db)
    return out


def room(x, wet_db=-11, t60=0.11):
    """A small kitchen adds a short tail of fading noise, different at each side."""
    t = TIME[:SR // 2]
    color = [(100, -28.5), (500, 5), (1500, 3.0), (6000, 10.0), (14000, 8.0)]
    tails = np.array([noise(color, len(t)) for _ in range(2)]) * fade(t, t60) * (t > .003)
    return x + undb(wet_db) * signal.oaconvolve(x, tails / np.linalg.norm(tails[0]), axes=1)[:, :N]


def ports(x):
    """The two microphone ports hear the pot with slightly different phase and colour."""
    # f/Hz, left ahead of right/rad
    phase_lead = [(0, 0), (260, -.12), (600, -.35), (1200, -.55), (3100, -.85), (4650, -.55), (7700, .2),
                  (16000, .8)]
    # f/Hz, left minus right level/dB
    balance = [(60, -3), (200, -2.5), (380, -3), (700, -2.5), (1290, -2), (2380, -2), (4400, -3),
               (8120, -0.5), (15000, 2)]
    hz = np.fft.rfftfreq(N, 1 / SR)
    left = undb(at_hz(balance, hz) / 2) * np.exp(.5j * np.interp(hz, *np.transpose(phase_lead)))
    return irfft(rfft(x) * np.array([left, 1 / left]), N)


def scene():
    """The pot in the kitchen, heard from a hand-held camera close by."""
    liquid = in_pot(plips() + snaps() + flops() + slosh())
    pot = ports(room(knocks() + liquid + sizzle()))
    return pot + handling() + background()


def record(dry, knee_db=-25, release_s=1.0):
    """Gain control ducks after loud blows and recovers slowly; the top is cut and the sound stops."""
    stop_s, top_hz = 9.293, 15100
    power = smooth(np.mean(dry ** 2, axis=0), release_s)
    ducked = dry / np.sqrt(1 + power / undb(knee_db) ** 2)
    top_cut = signal.ellip(8, .2, 70, top_hz, fs=SR, output="sos")
    return signal.sosfilt(top_cut, ducked * (TIME < stop_s))


dry = scene()
out = record(dry)
master(out)
```